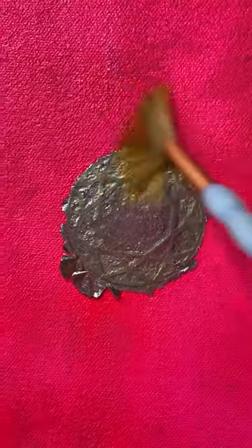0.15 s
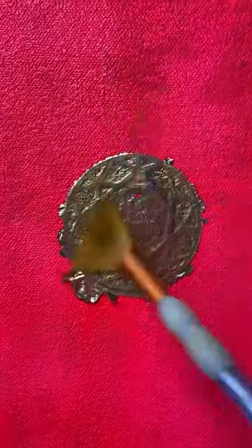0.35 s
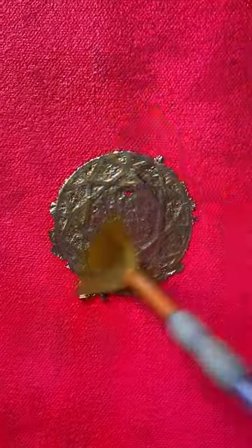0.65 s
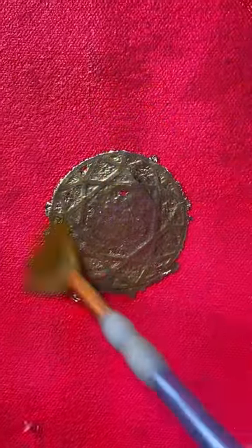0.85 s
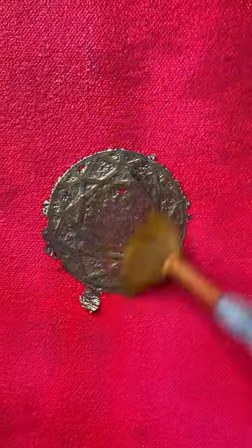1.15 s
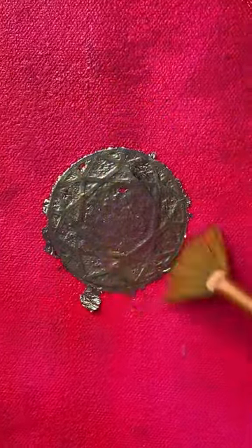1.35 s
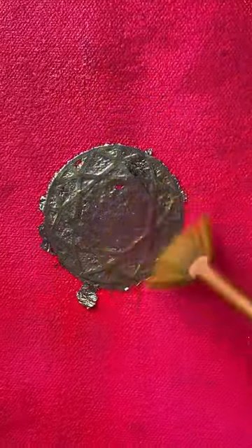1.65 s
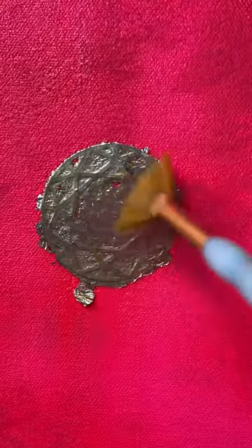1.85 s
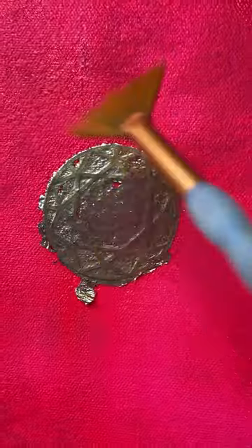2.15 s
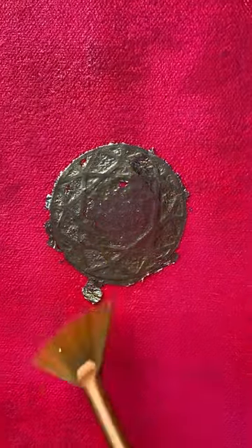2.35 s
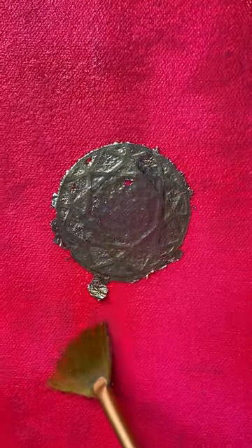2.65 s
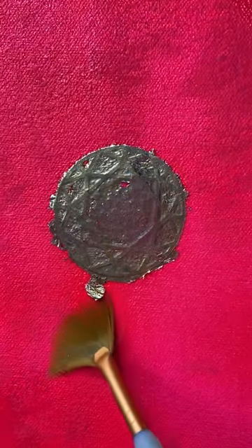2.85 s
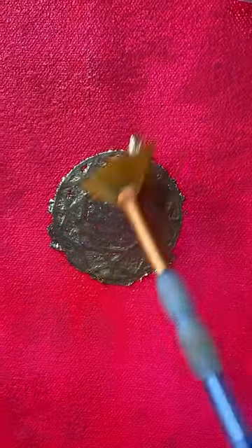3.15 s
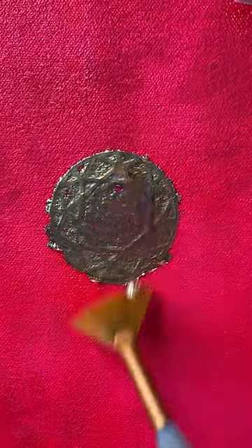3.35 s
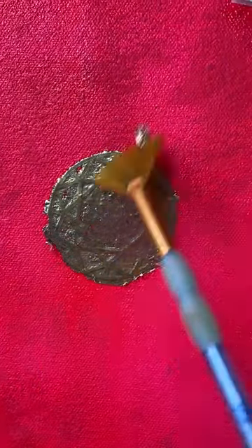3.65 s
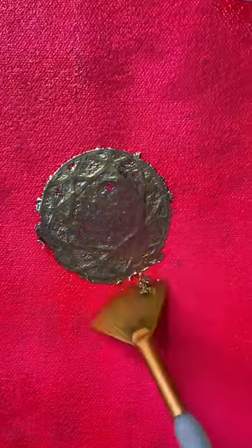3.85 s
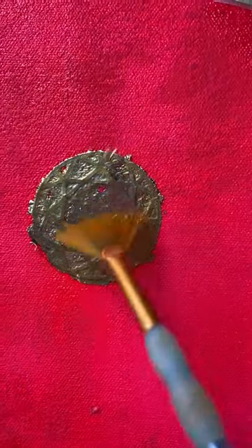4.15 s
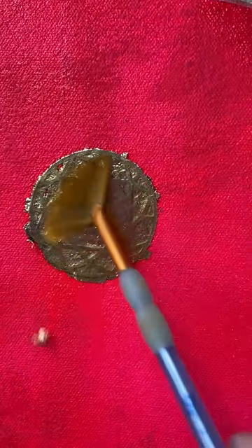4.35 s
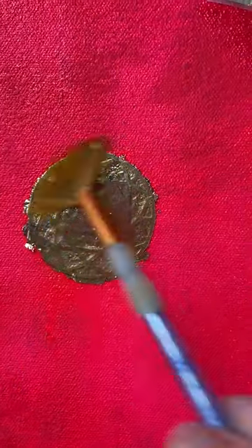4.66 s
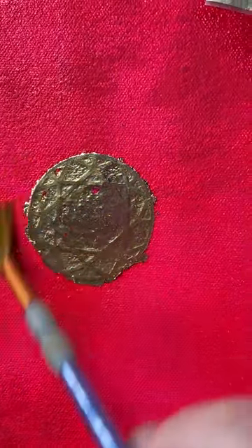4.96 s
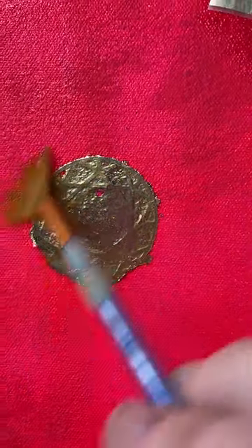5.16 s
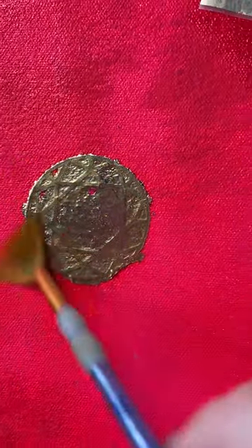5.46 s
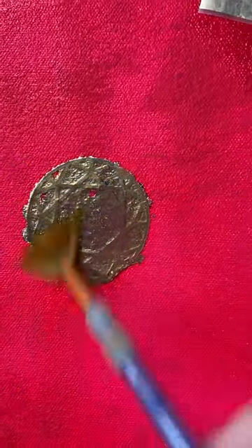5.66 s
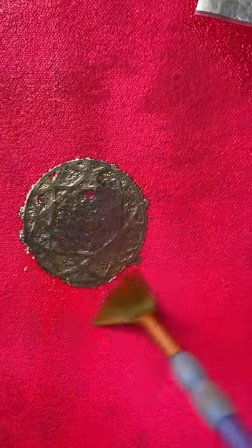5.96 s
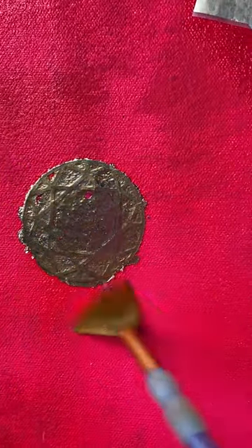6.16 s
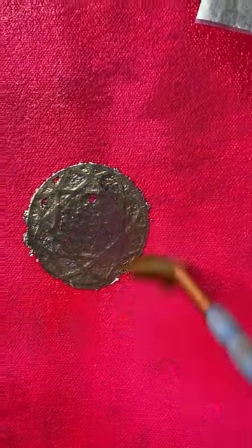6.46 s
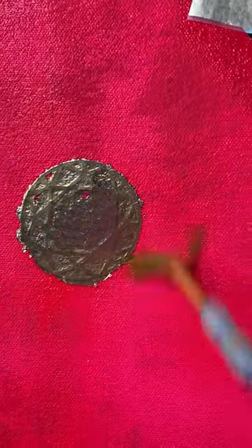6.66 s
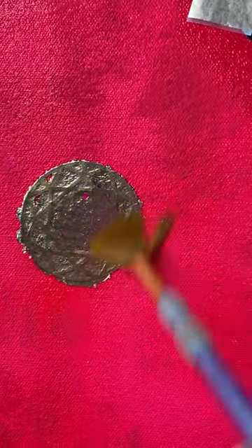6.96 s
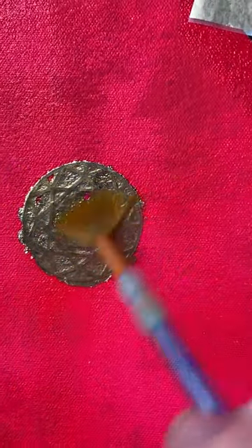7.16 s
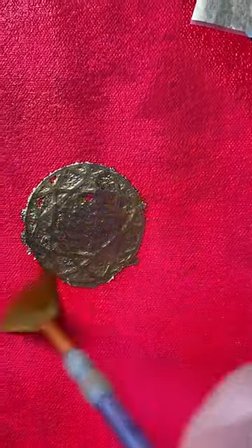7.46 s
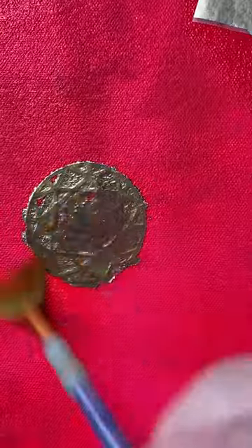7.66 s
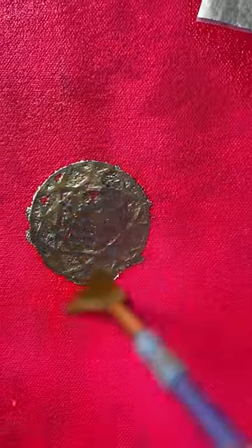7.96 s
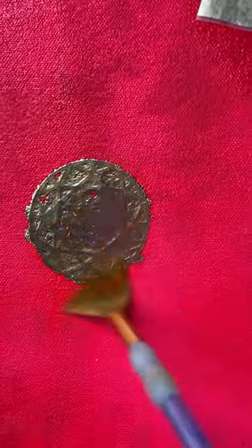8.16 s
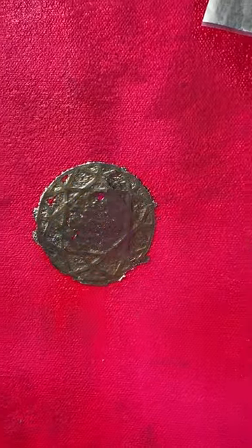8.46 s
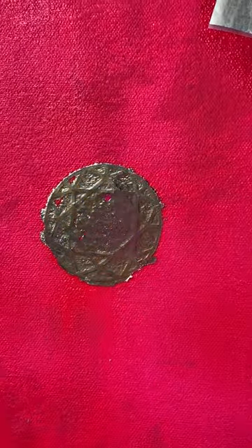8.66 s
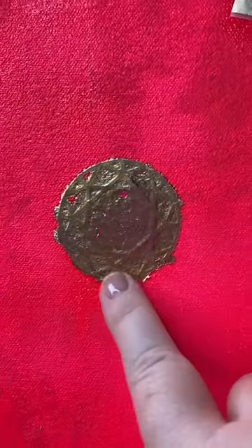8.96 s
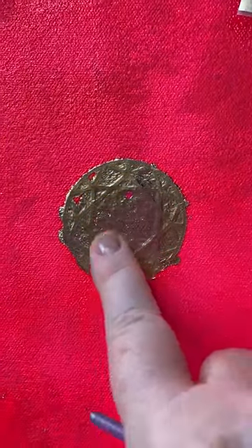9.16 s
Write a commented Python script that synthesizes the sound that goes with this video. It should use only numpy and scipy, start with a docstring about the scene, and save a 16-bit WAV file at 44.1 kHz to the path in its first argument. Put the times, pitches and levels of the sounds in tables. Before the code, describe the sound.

A low household machine hum near 60 Hz, with faint higher motor tones and soft rumble, runs throughout a quiet room. Close up, a soft fan brush starts on canvas: light, airy hisses from 0 to 1.2 s, brightest around 0.7-0.8. Separate gentle swishes with soft low bumps fall near 1.45, 1.75 and 2.0, then fainter ones at 2.35 with a tiny tick. After a short gap, a broader stroke rasps at 3.0-3.1, a small click at 3.43 and a rough, scratchy swipe at 3.6. Light taps at 3.95 lead to one loud, short hollow knock at 4.02. From 4.3 brushing becomes continuous, to and fro about nine times a second, with grainy scrapes near 6.05, 6.5, 6.7, 7.5 and 8.0. It thins out by 8.4, leaving hum, until a fingertip's dull, low rustle and soft thump near 9.25.

```python
"""Fan brush on a painted canvas

A soft fan brush sweeps loose gold leaf off an ornament, close to a pair of microphone ports.
Bristle tips hiss and the weave rasps: shaped noise pulses, single strokes first, then quickly to and fro.
Hard strokes scrape in coarse slips, knocks chirp downwards, and pushes and ticks ring canvas and handle.
A finger rustles down at the end. Household machines hum as sine tones over a rumble of coloured noise."""
import sys
import numpy as np
from scipy import signal
from scipy.fft import rfft, irfft
from scipy.io import wavfile

SR = 44100
rng = np.random.default_rng(int(sys.argv[2]) if len(sys.argv) > 2 else 0)


def generate_wav(signal):
    """Clip the signal to [-1, 1] and save it as 16-bit WAV at the path in sys.argv[1]."""
    frames = np.transpose(np.atleast_2d(signal))
    scaled = np.clip(frames, -1, 1) * 32767
    pcm = np.round(scaled).astype(np.int16)
    wavfile.write(sys.argv[1], SR, pcm)


N = 410130
TIME = np.arange(N) / SR
BIN_HZ = np.maximum(np.arange(N // 2 + 1) * SR / N, 1)  # kept above 0 for the logarithm


def from_db(db):
    """Turn decibels into gain."""
    return 10 ** (np.asarray(db) / 20)


def at_bins(points):
    """Read a table over log frequency at every spectral bin."""
    hz, value = np.transpose(points)
    return np.interp(np.log(BIN_HZ), np.log(hz), value)


def around(s, reach):
    """Pick the samples within reach of a moment, and their times counted from it, in seconds."""
    near = slice(max(int((s - reach) * SR), 0), int((s + reach) * SR))
    return near, TIME[near] - s


def drift(rate):
    """Wander at random with spread 1: noise low-passed at about rate Hz, drawn every 32nd sample."""
    points = 16384
    hz = np.fft.rfftfreq(points, 32 / SR)
    smoothing = np.exp(-(hz / rate) ** 2 / 2)
    slow = irfft(rfft(rng.standard_normal(points)) * smoothing)
    return np.interp(np.arange(N) / 32, np.arange(points), slow / slow.std())


def slips(per_s, spread_db):
    """Scatter tiny releases of single hairs, of uneven size, at random moments; rms 1 overall."""
    sizes = from_db(spread_db * np.clip(rng.standard_normal(N), -3, 3))
    released = rng.random(N) < per_s / SR
    clicks = rng.standard_normal((2, N)) * (sizes * released)
    return clicks / clicks.std()


def radiate(pair, colour):
    """Colour two unrelated excitations and mix them into partly alike left and right signals."""
    # left-right correlation of scattered sound: f/Hz, correlation (0-1)
    likeness = [(100, 0.98), (310, 0.97), (450, 0.4), (900, 0.42), (1300, 0.7), (1950, .97), (2500, .8),
                (3100, 0.55), (4300, 0.66), (4950, 0.95), (6300, .84), (7300, .98), (8300, .86),
                (15000, 0.87)]
    alike = np.clip(at_bins(likeness), 0, 1)
    common, scattered = rfft(pair) * from_db(at_bins(colour))
    middle = np.sqrt((1 + alike) / 2) * common
    side = np.sqrt((1 - alike) / 2) * scattered
    return irfft(middle + side * [[1], [-1]], N)


def shifting_colour(x, patchy_db, rate, count=5):
    """Different tufts touch from moment to moment, so each part of the spectrum flickers on its own."""
    place = np.interp(np.log(BIN_HZ), np.log([1200, 15000]), [0, count - 1])
    spectrum = rfft(x)
    out = 0
    for k in range(count):
        overlap = np.maximum(1 - np.abs(place - k), 0)  # neighbouring bands crossfade
        out = out + irfft(spectrum * overlap, N) * from_db(patchy_db * drift(rate))
    return out


def bounce(x, strength, smear_s=.00006):
    """Treble bounces once more between recorder body and canvas: a comb that moves with the height."""
    # height of the microphone above the canvas: t/s, height/m
    height_path = [(0, .148), (2.0, .147), (3.0, .1527), (4.7, .156), (6.8, .1635)]
    sway_m, sway_hz = 0.0023, 3.6  # the hand that holds the microphone sways
    sound_speed = 343  # m/s
    height = np.interp(TIME, *np.transpose(height_path)) + sway_m * drift(sway_hz)
    lag = 2 * height / sound_speed
    # the difference of two close copies favours the treble
    echo = [np.interp(TIME - lag + smear_s, TIME, side) - np.interp(TIME - lag, TIME, side) for side in x]
    return x + strength * np.array(echo)


def room():
    """Gently wavering rumble and faint air hiss, under motor tones that share one wandering speed."""
    # air noise, from deep rumble to faint hiss: f/Hz, level/dB per Hz
    air_colour = [(30, -76), (54, -64), (85, -65), (125, -69), (165, -75.5), (200, -64.5), (250, -68.5),
                  (310, -68.5), (380, -71.5), (410, -74), (510, -77), (590, -76), (830, -78.5), (1090, -84),
                  (1300, -86), (1900, -90.5), (2950, -90.5), (3300, -91), (12000, -108)]
    # tones of a fridge and a fan: f/Hz, rms level/dB
    motor_tones = [(58.95, -39), (120, -55.5), (131, -50.5), (196.5, -59), (215.3, -60), (240, -58.5),
                   (262, -63.5), (350, -62.5), (459, -68), (933, -77), (991, -68.5), (1049.5, -74),
                   (1107.5, -74), (2856, -74.5), (2914.5, -67), (2973, -72), (3149, -86)]
    waver_db, waver_hz = 0.72, 3.8
    wander_s, wander_hz = .00003, .4  # time gained or lost by the motors, and its pace
    noise = radiate(np.sqrt(SR / 2) * rng.standard_normal((2, N)), air_colour)
    noise = noise * from_db(waver_db * drift(waver_hz))
    clock = TIME + wander_s * drift(wander_hz)
    tones = np.zeros(N)
    for hz, level_db in motor_tones:
        tones += from_db(level_db) * np.sin(2 * np.pi * (hz * clock + rng.random()))
    return noise + np.sqrt(2) * tones  # rms to peak


def finger():
    """A fingertip slides onto the canvas: skin rubs the cloth with a dull rustle, noise under a swell."""
    # pressure of the fingertip: t/s, relative level/dB
    pressure_path = [(8.9, -68), (9.1, -52), (9.19, -32), (9.24, -26.5), (9.3, -36)]
    # colour of the rustle: f/Hz, relative level/dB per Hz
    rustle_colour = [(60, -14), (130, 10), (240, 7), (420, 0), (800, -9), (2000, -51), (10000, -46)]
    pressure = from_db(np.interp(TIME, *np.transpose(pressure_path)))
    return radiate(pressure * rng.standard_normal((2, N)), rustle_colour)


def pushes():
    """Soft pushes of brush or finger bulge the canvas, which swings briefly at its own low pitch."""
    # pushes: t/s of the peak, level/dB, half length/s (to 1/e)
    push_list = [(1.467, -27.5, .006), (1.758, -29.5, .014), (2.021, -33, .008), (6.053, -29, .008),
                 (8.333, -27.5, .008), (9.271, -28.5, .008)]
    canvas_hz = 106
    out = np.zeros(N)
    for s, level_db, half_length in push_list:
        near, age = around(s, .5)
        swell = np.exp(-(age / half_length) ** 2)
        out[near] += from_db(level_db) * swell * np.cos(2 * np.pi * canvas_hz * age)
    return out


def knocks():
    """Bending waves run faster at high pitch, so each knock arrives as a quick falling chirp."""
    # knocks on the canvas: t/s, level/dB, starting f/Hz, time to fall an octave/s, swell/s, length/s
    knock_list = [(3.9431, -31, 3200, .0005, .0003, .003), (3.9523, -23, 500, .01, .0006, .0035),
                  (3.9548, -18.5, 830, .0018, .001, .0125), (4.0180, -12.5, 2390, .00043, .0023, .0215)]
    out = np.zeros(N)
    for s, level_db, start_hz, octave_s, swell, length in knock_list:
        near, age = around(s, .5)
        age = np.maximum(age, 0)
        turns = start_hz * octave_s * np.log1p(age / octave_s)
        envelope = (1 - np.exp(-age / swell)) * np.exp(-(age / length) ** 2)
        out[near] -= from_db(level_db) * envelope * np.sin(2 * np.pi * turns)
    return out


def ticks(decay_s=0.0019):
    """A hard contact of the brush gives a dry crack and sets the handle ringing for a few milliseconds."""
    # contacts: t/s, relative crack level/dB, handle ring level/dB
    contacts = [(2.448, -51, -52), (3.4319, -37, -38), (3.437, -43, -52), (3.9434, -40, -54),
                (3.955, -39, -58), (4.0183, -35.5, -60), (5.784, -39, -45)]
    # colour of the crack: f/Hz, relative level/dB per Hz
    crack_colour = [(400, 8), (900, 0), (1800, -14), (2700, 2.5), (4000, -14), (5500, -1), (9000, -8),
                    (15500, -16)]
    # modes of the brush handle: f/Hz, level/dB relative to the ring, decay/s
    handle_modes = [(1690, 0, .004), (1830, -2, .004), (3150, -8, .003), (5220, -17, .003)]
    force, ring = np.zeros(N), np.zeros(N)
    for s, crack_db, ring_db in contacts:
        near, age = around(s, .5)
        force[near] += from_db(crack_db) * (age >= 0) * np.exp(-np.abs(age) / decay_s)
        age = np.maximum(age, 0)
        for hz, mode_db, decay in handle_modes:
            ring[near] += from_db(ring_db + mode_db) * np.exp(-age / decay) * np.sin(2 * np.pi * hz * age)
    crack = radiate(force * rng.standard_normal((2, N)), crack_colour)
    return ring + from_db(11.5) * crack


def drags():
    """Hard-pressed, bent bristles judder over the weave in coarse slips; the scrape builds, then lets go."""
    # scraping strokes: t/s of greatest pressure, build-up/s, relative level/dB
    scrapes = [(3.1, .03, -41), (3.596, .03, -27), (6.0, 0.015, -29), (6.051, 0.028, -26.5),
               (6.47, .03, -31), (6.678, .02, -32), (7.53, .02, -26.5), (7.999, .006, -29)]
    # colour of the cloth they drum on: f/Hz, relative level/dB per Hz
    scrape_colour = [(120, -3), (300, 4), (550, 0.5), (900, -1), (1500, -6.5), (2500, -13), (4000, -24),
                     (10000, -34)]
    release_s = 0.011  # the bristles spring free
    pressure = np.zeros(N)
    for s, build_s, level_db in scrapes:
        near, age = around(s, .5)
        build_or_release = np.where(age < 0, build_s, release_s)
        pressure[near] += from_db(level_db) * np.exp(-(age / build_or_release) ** 2)
    return radiate(pressure * slips(per_s=1500, spread_db=3.5), scrape_colour)


def brush():
    """Tips hiss and the weave under them rasps with the speed of the hand; tufts catch and let go."""
    # strokes, single at first, then to and fro about nine times a second:
    # t/s of greatest speed, length/s, relative bristle hiss level/dB, relative weave rasp level/dB
    strokes = [(0.075, 0.11, -59.5, -63), (0.18, 0.07, -53.5, -64), (0.283, 0.2, -49, -55.5),
               (0.426, 0.11, -48.5, -61), (0.552, 0.23, -48.5, -57), (0.563, 0.025, -44, -55),
               (0.705, 0.1, -42, -63), (0.82, 0.026, -40.5, -64.0), (0.843, 0.13, -46.5, -53.5),
               (0.952, 0.074, -42, -65), (1.072, 0.072, -44.5, -61), (1.158, 0.1, -51, -69),
               (1.45, 0.074, -45, -55.5), (1.76, 0.11, -46.5, -54.5), (2.023, 0.055, -45, -58),
               (2.328, 0.029, -47.0, -66), (2.367, 0.092, -51.5, -62), (2.458, 0.062, -50, -57),
               (2.994, 0.22, -49.5, -58.5), (3.1, 0.1, -45.5, -52.5), (3.559, 0.17, -48.5, -54),
               (3.587, 0.054, -37.5, -47.5), (3.947, 0.044, -47, -52), (4.027, 0.03, -46, -53),
               (4.339, 0.1, -46.5, -56.5), (4.472, 0.072, -46.5, -55), (4.6, 0.1, -43, -60),
               (4.63, 0.029, -42, -59), (4.738, 0.12, -44, -53), (4.864, 0.1, -49, -59.5),
               (4.974, 0.07, -44, -51.5), (5.079, 0.1, -41, -58), (5.208, 0.046, -50.5, -51.5),
               (5.3, 0.15, -48.0, -58), (5.45, 0.12, -48.0, -54), (5.538, 0.144, -44, -70),
               (5.676, 0.055, -42, -55.5), (5.782, 0.086, -43.5, -52.5), (5.892, 0.057, -44.5, -58),
               (6.007, 0.17, -46, -52.5), (6.051, 0.024, -42.5, -46), (6.244, 0.12, -47, -53.5),
               (6.353, 0.054, -47.5, -54), (6.463, 0.077, -42.0, -48), (6.572, 0.063, -45.5, -53),
               (6.677, 0.058, -41.5, -48), (6.785, 0.067, -45, -52.0), (6.892, 0.068, -44.5, -49),
               (6.993, 0.055, -46.5, -54.5), (7.079, 0.055, -45, -53), (7.206, 0.063, -43.5, -66),
               (7.298, 0.075, -44.5, -54.5), (7.414, 0.089, -45.5, -49.5), (7.453, 0.051, -38.5, -60.0),
               (7.526, 0.094, -40, -50), (7.651, 0.11, -48.5, -52), (7.756, 0.076, -40, -51.5),
               (7.874, 0.091, -47.5, -56), (7.964, 0.06, -43.5, -61), (7.996, 0.077, -44, -51.5),
               (8.128, 0.11, -50.5, -61.0), (8.217, 0.09, -53.5, -59.5), (8.328, 0.051, -43, -65),
               (8.417, 0.21, -62.5, -69)]
    # colours of the bristle tips and of the rubbed weave: f/Hz, relative level/dB per Hz
    tip_colour = [(1500, -10), (3000, -7.5), (4200, -5), (5200, -2), (6500, -3), (8500, -4), (11000, -1.5),
                  (13000, -1), (15500, -3)]
    weave_colour = [(120, -25), (300, 1), (600, 9), (1000, 0), (1500, 5.5), (2000, 0.5), (2500, 4),
                    (3400, -5.5), (5200, -1), (8000, -10), (15000, -44)]
    swell_share = 0.58  # part of a stroke spent gathering speed
    roundness = 1.45  # shape of a stroke: 1 pointed, 2 bell-like
    rasp_power = 1.35  # the rasp falls away faster than the hiss as the brush slows
    catch_db, catch_hz = 0.78, 54  # depth and pace of the catching tufts
    hiss_energy, rasp_energy = np.zeros(N), np.zeros(N)
    for s, length, hiss_db, rasp_db in strokes:
        near, age = around(s, .5)
        swell_or_fade = length * np.where(age < 0, swell_share, 1 - swell_share)
        speed = np.exp(-np.abs(age / swell_or_fade) ** roundness)
        hiss_energy[near] += (from_db(hiss_db) * speed) ** 2
        rasp_energy[near] += (from_db(rasp_db) * speed ** rasp_power) ** 2
    tufts = from_db(catch_db * drift(catch_hz))
    tips = radiate(np.sqrt(hiss_energy) * tufts * slips(per_s=14000, spread_db=0.2), tip_colour)
    weave = radiate(np.sqrt(rasp_energy) * tufts * slips(per_s=5000, spread_db=2.5), weave_colour)
    rubbing = from_db(3.5) * tips + from_db(11.0) * weave
    flickering = shifting_colour(rubbing, patchy_db=2.0, rate=27)
    return bounce(flickering, strength=0.19)


def scene():
    """Layer the room behind, and finger, canvas and brush close by."""
    return room() + finger() + pushes() + knocks() + ticks() + drags() + brush()


def record(dry):
    """The two ports differ in phase and level, pitch by pitch; the deepest bass and the top are cut."""
    # left port against right: f/Hz, phase lead/rad
    port_phase = [(0, -.08), (300, -.05), (500, .35), (700, 1.35), (1150, .5), (1650, 0), (2050, .05),
                  (2750, .65), (3450, .65), (3700, .95), (4400, 1.25), (4750, .1), (5100, .08), (5500, .75),
                  (6500, 2.4), (7300, 3.14), (10300, 6.28), (13500, 9.42), (16000, 12.05)]
    # left port against right: f/Hz, level/dB
    port_balance = [(70, -1.5), (150, -3), (280, -7), (370, -12), (520, -7), (590, -5.5), (850, -1),
                    (2000, -0.5), (4400, -0.4), (5500, 0)]
    cutoff_hz = 15850
    lead = np.interp(BIN_HZ, *np.transpose(port_phase))
    sides = np.array([[1], [-1]]) / 2  # each port takes half of the difference
    gain = from_db(sides * at_bins(port_balance))
    even_gain = gain / np.sqrt(np.mean(gain ** 2, axis=0))  # keeps the mean power of the two
    ports = even_gain * np.exp(1j * sides * lead)
    bass_cut = signal.butter(4, 35, "high", fs=SR, output="sos")
    thinned = signal.sosfilt(bass_cut, dry)
    low_pass = 1 / np.sqrt(1 + (BIN_HZ / cutoff_hz) ** 400)
    return irfft(rfft(thinned) * ports * low_pass, N)


dry = scene()
out = record(dry)
generate_wav(out)
```